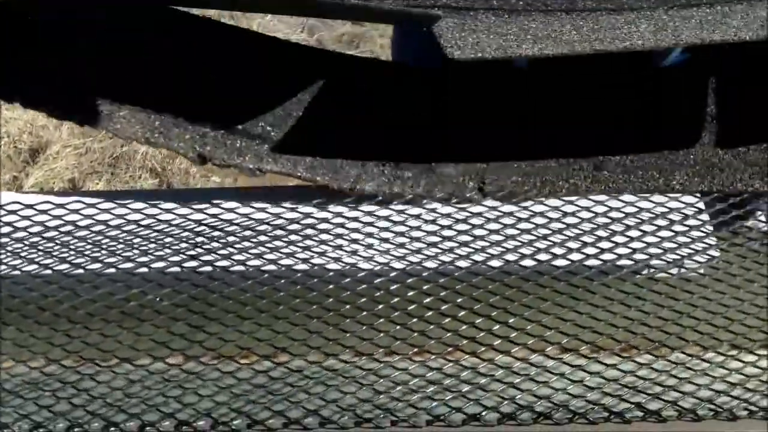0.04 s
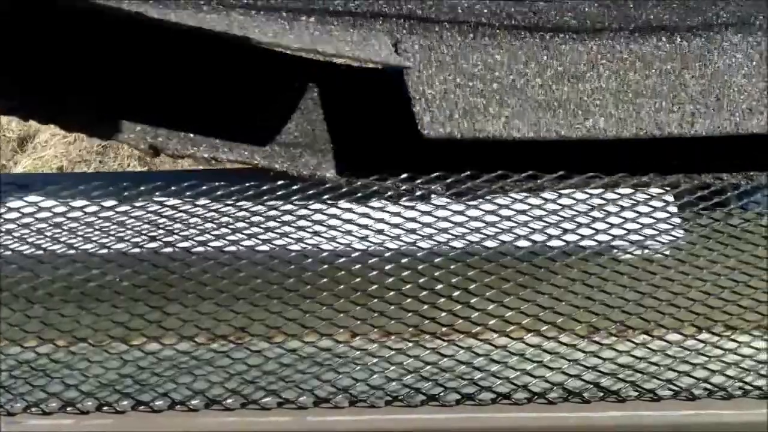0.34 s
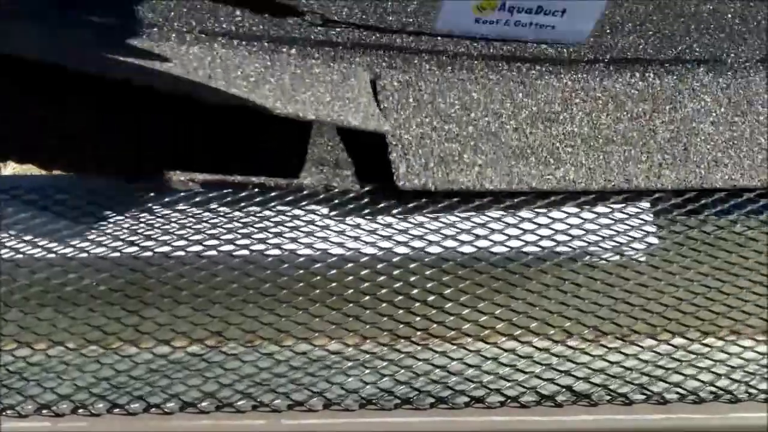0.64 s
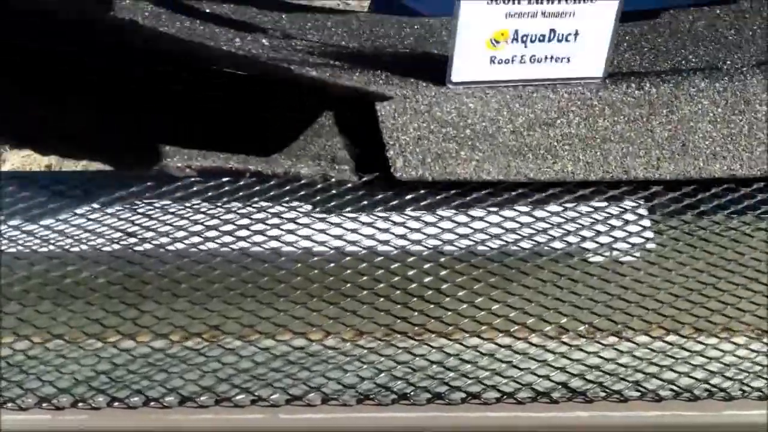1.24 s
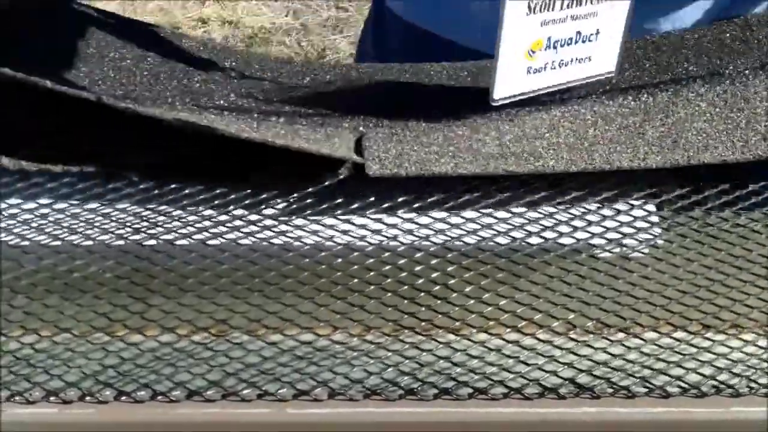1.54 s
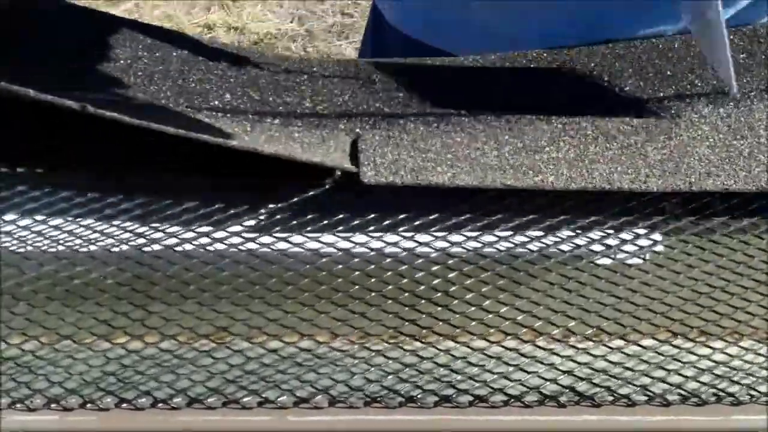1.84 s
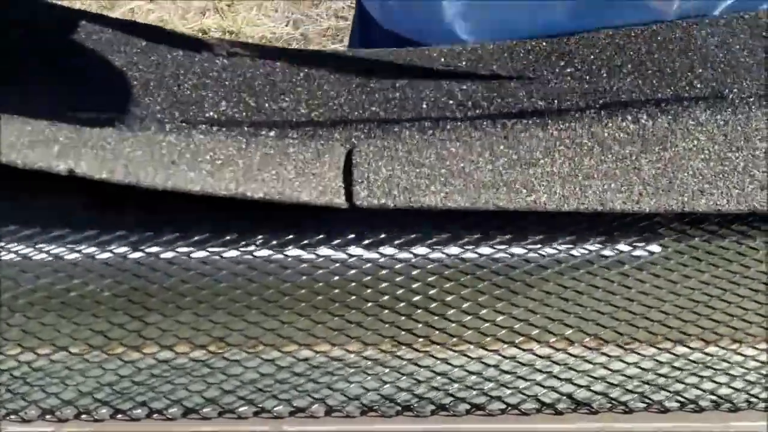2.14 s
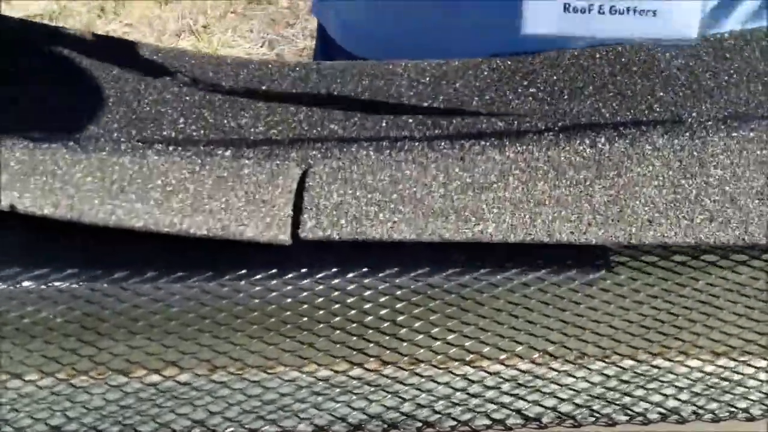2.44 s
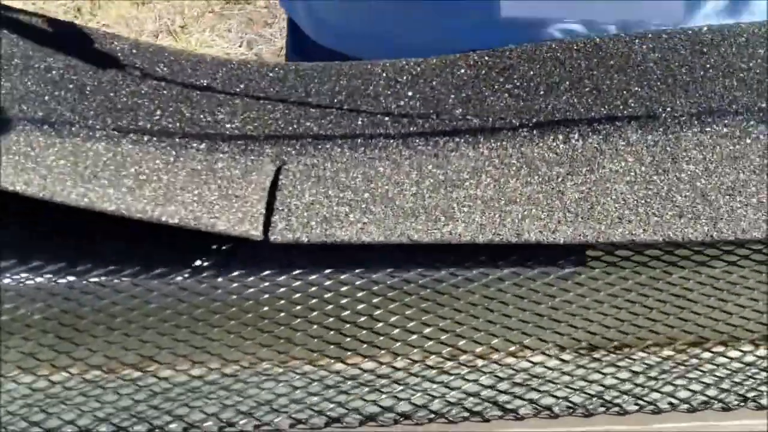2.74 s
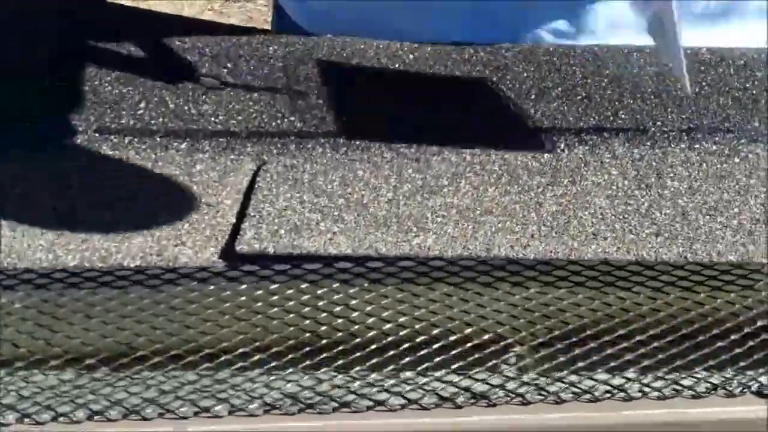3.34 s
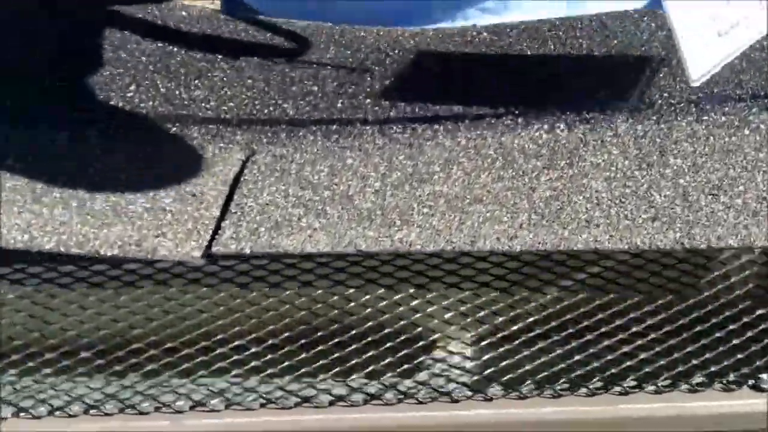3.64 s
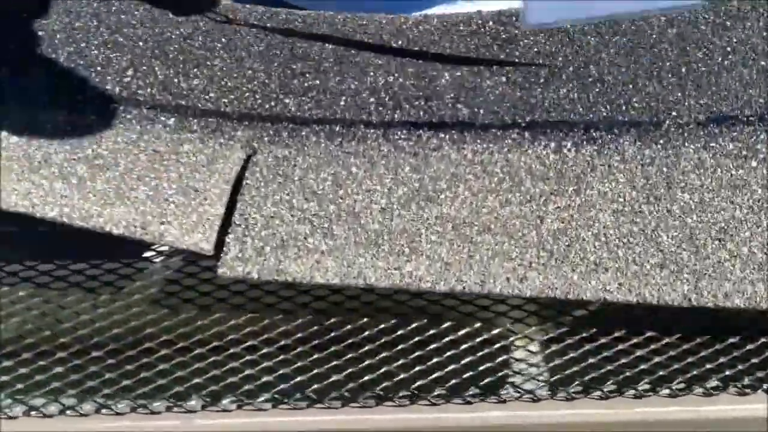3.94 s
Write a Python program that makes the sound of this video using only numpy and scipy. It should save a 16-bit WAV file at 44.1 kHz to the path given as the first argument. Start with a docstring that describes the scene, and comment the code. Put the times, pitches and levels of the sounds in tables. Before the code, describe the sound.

Close up outdoors, metal mesh grates against rough shingles in short, uneven pushes. Light wire ticks come first, then a brief chatter and small rattling snags, with low gusts of wind thumping on the microphone throughout.

```python
"""Metal mesh pushed under roof shingles

A sheet of expanded metal mesh slides in fits and starts, close to the microphone. Friction is a train
of tiny impacts: strands grate over the grit, chatter, snag and spring free. The impacts excite free
vibration, so the wires tick and the sheet rings hollow over the gutter. Wind buffets the microphone."""
import sys
import numpy as np
from scipy import signal
from scipy.fft import rfft, irfft
from scipy.io import wavfile
from scipy.ndimage import uniform_filter1d

SR = 44100
rng = np.random.default_rng(int(sys.argv[2]) if len(sys.argv) > 2 else 0)


def generate_wav(signal):
    """Clip the signal to [-1, 1] and save it as 16-bit WAV at the path in sys.argv[1]."""
    frames = np.transpose(np.atleast_2d(signal))
    scaled = np.clip(frames, -1, 1) * 32767
    pcm = np.round(scaled).astype(np.int16)
    wavfile.write(sys.argv[1], SR, pcm)


N = 176400

# Levels in the tables are relative; each source applies its own gain.
# Spectra of the outdoor air and of the wind's rumble and flutter (frequency [Hz], level [dB])
AIR_SPECTRUM = [(30, 57.5), (200, -25.5), (600, 11), (2000, -27), (8000, -111), (16000, -21)]
RUMBLE_SPECTRUM = [(10, -1), (25, 8), (42, -4), (70, 0.5), (110, -12), (200, -28.5), (500, -42.5),
                   (4000, -75)]
FLUTTER_SPECTRUM = [(50, -11), (120, 3), (190, -1.5), (320, -10), (500, -19), (1000, -31), (4000, -76)]
# Wind on the microphone (time [s], rumble level [dB], flutter level [dB])
GUSTS = [(0, -31, -42), (.08, -15, -37), (.18, -24, -53), (.25, -15.5, -29), (.55, -36, -35.5),
         (.76, -12, -22), (.86, -21.5, -33), (.92, -32, -27), (.98, -17.5, -24), (1.03, -35, -35.5),
         (1.18, -21.5, -38), (1.3, -14.5, -27), (1.42, -12.5, -15.5), (1.47, -24, -33), (1.51, -11.5, -23),
         (1.57, -17, -29), (1.71, -18.5, -21.5), (1.78, -24.5, -41), (1.87, -18, -42), (1.94, -28, -42),
         (1.99, -34, -17.5), (2.03, -24, -21), (2.12, -13, -23), (2.16, -23, -20.5), (2.3, -8, -12.5),
         (2.42, -21.5, -31), (2.58, -16, -20), (2.66, -24, -36), (2.76, -38, -41), (2.95, -32, -39),
         (3.08, -12, -25), (3.13, -22, -23), (3.2, -10, -17.5), (3.45, -13.5, -21.5), (3.54, -19, -20),
         (3.6, -13, -20), (3.8, -16.5, -30), (3.87, -13, -11), (3.93, -13.5, -39), (4, -16.5, -50)]
# Single eddies striking the microphone (time [s], level [dB], swing length [ms])
EDDY_STRIKES = [(.076, -20, 17), (.602, -12, 6.5), (0.744, -3, 10.3), (0.987, -8.5, 14),
                (1.407, -3.5, 14.5), (1.424, -10, 6), (1.508, -4, 6.8), (1.517, -5, 6.8),
                (1.605, -2.5, 9.2), (1.705, -11, 6.8), (1.868, -4, 13), (1.99, 0, 12), (2.045, -8.5, 25),
                (2.116, -5.5, 19), (2.577, -2, 6), (3.221, -4.5, 7.9), (3.243, -9, 9.5), (3.27, -4.5, 15),
                (3.342, -11, 11), (3.4112, 0.5, 5.5), (3.419, -10, 13), (3.483, -5, 6.8), (3.4935, -3.5, 3),
                (3.511, -10, 4.9), (3.564, -9, 5.9), (3.695, -1.5, 5.5), (3.764, -2, 10.4),
                (3.870, -10, 31)]
# Strands rubbing a shingle edge (time [s], half-length [s], resonance [Hz], level [dB])
RUBS = [(1.516, 0.0091, 2040, -23.5), (1.545, .02, 1620, -31), (1.56, 0.026, 1390, -29.5),
        (1.587, 0.016, 1950, -26), (1.613, 0.049, 1370, -31), (1.669, .012, 1880, -30.5),
        (1.694, 0.011, 1840, -25), (1.707, 0.038, 1680, -32)]
# Single wires flicking off a granule (time [s], level [dB])
WIRE_FLICKS = [(0.0925, -12), (0.1036, -1.5), (.114, -5.5), (.337, -9.5), (.3534, -8), (0.367, -6.5),
               (0.4275, -2), (.4285, -11), (.4305, -5), (0.4714, -7), (0.486, -5), (.4898, -13), (.495, -6),
               (0.5026, 2), (.5265, -11), (.5474, -18), (.566, -21), (0.5782, -10), (0.6807, -16.5),
               (.694, -14), (0.7112, -11), (0.763, -5.5), (0.7878, -5.5), (2.9502, -25)]
# Snagged mesh springing free (time [s], level [dB], decay time [s])
RELEASES = [(0.9536, -22, .008), (1.005, -11.5, 0.0079), (1.107, -13.5, 0.011), (1.206, -15.5, 0.0059),
            (1.803, -11, 0.0052), (2.045, -20, 0.008), (2.2078, -11.5, 0.01), (2.315, -18.5, 0.012),
            (2.433, -15, 0.02), (2.621, -13, 0.013), (2.686, -19, .008), (2.728, -9.5, 0.0065),
            (2.807, -13.5, 0.0091), (2.826, -12, 0.0058), (2.973, -18.5, 0.011), (3.521, -25.5, 0.0082),
            (3.574, -21.5, 0.026), (3.9745, -12, 0.0081)]
# Spectra of the four kinds of contact (frequency [Hz], level [dB])
TICK_SPECTRUM = [(300, -74), (2000, -22), (4500, -13.5), (6400, -3), (7500, -11), (9200, -2), (11500, -16),
                 (16000, -18)]
SNAG_SPECTRUM = [(150, -11), (450, -16), (650, 7.5), (1000, 6), (2000, -16), (3200, -0.5), (4800, -1),
                 (6400, 5.5), (7400, -7), (8900, 4), (11500, -5.5), (16000, -16)]
RASP_SPECTRUM = [(150, 1), (350, 6.5), (800, -1), (1000, -1), (1200, -14), (1450, 0.5), (1850, 2),
                 (2500, -3), (3200, -3), (4200, -9.5), (6000, -6.5), (12000, -87)]
GRATING_SPECTRUM = [(1500, -20), (2500, -6), (4000, -4.5), (5200, -3), (6450, -0.5), (7000, -7.5),
                    (7800, -6), (8850, 2.5), (10000, -5.5), (11500, -10.5), (13500, -19), (16000, -18)]
# Normal modes of the sheet (frequency [Hz], level [dB], T60 [s])
SHEET_MODES = [(261, -13, 0.18), (323, -13.5, 0.096), (488, -6.5, 0.17), (528.3, -2.5, 0.078),
               (561.5, -1.5, 0.08), (601, -2.5, .1), (659, -1, 0.036), (716.7, -3.5, 0.096),
               (781, -9, 0.068), (855, -11.5, 0.12), (1141, -12.5, .07), (1241, -7.5, 0.027)]
# Strength of the sliding contact (time [s], level [dB])
SLIDE_LEVEL = [(0, -24.5), (.02, -31), (.06, -31), (.10, -31), (.13, -33), (.175, -24.5), (.22, -23),
               (.29, -29.5), (.4, -31), (.46, -28.5), (.495, -18), (.515, -28.5), (.557, -39.5), (.65, -45),
               (.75, -44.5), (.785, -27.5), (.82, -37.5), (.86, -28), (.892, -42), (.94, -37), (.964, -21),
               (1.01, -19.5), (1.05, -24), (1.1, -31.5), (1.113, -21), (1.19, -30.5), (1.21, -25),
               (1.275, -35), (1.3, -29), (1.33, -40.5), (1.48, -35), (1.51, -20), (1.59, -25.5),
               (1.64, -29.5), (1.715, -23), (1.77, -26.5), (1.796, -39), (1.808, -15), (1.85, -22),
               (1.89, -34), (1.975, -27.5), (2.0, -33), (2.035, -40), (2.047, -25.5), (2.085, -34),
               (2.105, -27.5), (2.167, -39.5), (2.2, -38.5), (2.209, -19.5), (2.28, -30.5), (2.335, -18),
               (2.405, -29), (2.44, -21), (2.49, -29.5), (2.555, -36), (2.59, -20), (2.628, -18.5),
               (2.67, -23), (2.7, -19), (2.76, -23.5), (2.79, -22), (2.82, -19.5), (2.855, -23.5),
               (2.895, -21), (2.94, -28), (2.98, -26), (3.09, -33), (3.11, -24), (3.15, -28), (3.195, -17),
               (3.245, -26.5), (3.29, -36.5), (3.32, -31.5), (3.44, -48), (3.5, -35.5), (3.56, -36.5),
               (3.595, -17.5), (3.69, -24), (3.72, -33), (3.79, -43.5), (3.807, -30), (3.835, -29.5),
               (3.855, -21.5), (3.9, -36), (3.999, -19)]
# Balance against the grating (time [s], sheet level [dB], rasp level [dB])
SCRAPE_BALANCE = [(0, 2.5, 6), (.1, 0, -3), (.22, 0.5, -5.5), (.42, 2, -1), (.5, -12, -8), (.62, 4.5, -2.5),
                  (.8, 0.5, -3.5), (.95, 1.5, -3.5), (1.25, 4.5, 0.5), (1.42, 0.5, -6), (1.52, -10, -8.5),
                  (1.62, -7, -26), (1.76, -9, -8), (1.83, 1.5, -2.5), (2.15, 4, 0.5), (2.33, -1, -3),
                  (2.54, 3.5, 3), (2.63, -0.5, -5), (2.92, 0.5, 0.5), (3.08, 3, -1), (3.2, -2.5, -3),
                  (3.42, -2, 2), (3.62, -7.5, -2), (3.76, 4, -3.5), (3.86, -7, -9), (4, 2, -3)]


def undb(db):
    """Amplitude ratio of a level in decibels."""
    return 10 ** (np.asarray(db) / 20)


def unit(x):
    """Normalisation to an rms of 1."""
    return x / np.sqrt(np.mean(x ** 2))


def curves(rows):
    """Linear interpolation of each column over time."""
    rows = np.array(rows, float)
    rows = rows[np.argsort(rows[:, 0], kind="stable")]
    return [np.interp(np.arange(N) / SR, rows[:, 0], column) for column in rows.T[1:]]


def wander(rate):
    """Random fluctuation of unit rms: noise averaged twice over 1/rate seconds."""
    width = max(int(SR / rate), 2)
    averaged = uniform_filter1d(rng.standard_normal(N), width, mode="wrap")
    return unit(uniform_filter1d(averaged, width, mode="wrap"))


def convolve(x, response):
    """Convolution with an impulse response scaled to unit energy."""
    return signal.fftconvolve(x, response / np.linalg.norm(response))[:N]


def colour(x, spectrum, size=8192):
    """Minimum-phase filtering to a spectral shape, by folding the cepstrum."""
    hz, db = np.array(spectrum).T
    bins_hz = np.maximum(np.fft.rfftfreq(size, 1 / SR), 1)
    gain = undb(np.interp(np.log(bins_hz), np.log(hz), db))
    cepstrum = irfft(np.log(gain))
    cepstrum[1:size // 2] *= 2
    cepstrum[size // 2 + 1:] = 0
    return convolve(x, irfft(np.exp(rfft(cepstrum))))


def damping(t, t60):
    """Exponential decay by 60 dB in t60 seconds."""
    return np.exp(-np.log(1000) * t / t60)


def air():
    """Ambient noise: quiet outdoor air as a steady random pressure."""
    return undb(-53) * colour(rng.standard_normal(N), AIR_SPECTRUM)


def turbulence(spectrum, eddies_per_s=54, depth_db=3.5):
    """Turbulent pressure: noise whose level fluctuates as eddies pass."""
    pressure = rng.standard_normal(N) * undb(depth_db * wander(eddies_per_s))
    return unit(colour(pressure, spectrum))


def wind(ceiling=.62):
    """Turbulence and single eddies press on the microphone; saturation rounds the largest swings."""
    t = np.arange(N) / SR
    rumble_db, flutter_db = curves(GUSTS)
    pressure = turbulence(RUMBLE_SPECTRUM) * undb(rumble_db - 1.5)
    pressure += turbulence(FLUTTER_SPECTRUM) * undb(flutter_db - 3)
    for time, db, swing_ms in EDDY_STRIKES:
        phase = 2 * np.pi * (t - time) / (swing_ms / 1000)
        pressure -= undb(db) * phase / (1 + (phase / 2) ** 2) ** 2  # a push, then suction
    return ceiling * np.tanh(pressure / ceiling)


def grit(per_s, spread_db):
    """A Poisson process of impacts between strands and granules, random in strength and sign."""
    strength = np.minimum(rng.exponential(size=N), 4)
    hits = rng.random(N) < per_s / SR
    return unit(hits * undb(spread_db * strength) * rng.choice([-1, 1], N))


def wire_response(samples, t60, ring_db):
    """Impulse response of a wire: the direct click, then a damped, noisy ring."""
    response = rng.standard_normal(samples) * damping(np.arange(samples) / SR, t60)
    response *= undb(ring_db) / np.linalg.norm(response)
    response[0] = 1
    return response


def wires(force, t60=.054, ring_db=1.5, count=14, shifts_per_s=12):
    """A wandering load: each impact rings whichever wire bears the most at that instant."""
    loads = [7 * wander(shifts_per_s) + 10 * rng.random(N) for _ in range(count)]
    struck = np.argmax(loads, axis=0)
    return sum(convolve(force * (struck == k), wire_response(SR // 12, t60, ring_db))
               for k in range(count))


def sheet(force):
    """Modal superposition: each impact drives each low mode of the sheet with a random sign."""
    t = np.arange(SR // 3) / SR
    sound = 0
    for hz, db, t60 in SHEET_MODES:
        mode = np.sin(2 * np.pi * hz * t) * damping(t, t60)
        sound += undb(db) * convolve(force * rng.choice([-1, 1], N), mode)
    return sound / np.linalg.norm(undb([db for _, db, _ in SHEET_MODES]))


def crumbs(follow=.78):
    """Light impacts: loose granules tick on the wires, even while the mesh barely moves."""
    slide_db, = curves(SLIDE_LEVEL)
    hits = grit(per_s=60, spread_db=4) * undb(follow * slide_db - 18)
    return colour(wires(hits, t60=.025, ring_db=-2, count=4), TICK_SPECTRUM)


def chatter(relative_bandwidth=.29):
    """Stick-slip friction: each short rub excites a strand's resonance at a different pitch."""
    t = np.arange(N) / SR
    sound = 0
    for time, half_length, hz, db in RUBS:
        resonance = signal.iirpeak(hz, 1 / relative_bandwidth, fs=SR)
        strand = signal.lfilter(*resonance, grit(per_s=1200, spread_db=3))
        envelope = np.exp(-2 * ((t - time) / half_length) ** 2)
        sound += unit(strand) * undb(db - 3) * envelope
    return sound


def ticks():
    """Impulsive excitation: a wire flicks off a granule with a thin click and a brief ring."""
    samples = SR // 20
    flicks = np.zeros(N + samples)
    for time, db in WIRE_FLICKS:
        start = int(time * SR)
        flicks[start:start + samples] += undb(db + 1.5) * wire_response(samples, t60=.0085, ring_db=-1)
    return colour(flicks, TICK_SPECTRUM)


def snags():
    """Release of elastic energy: a caught edge lets go in a fading rattle that shakes the sheet."""
    t = np.arange(N) / SR
    force = sum(undb(db - .5) * (t >= time) * np.exp(-np.abs(t - time) / decay)
                for time, db, decay in RELEASES)
    rattle = force * grit(per_s=28000, spread_db=-1)
    return colour(rattle, SNAG_SPECTRUM) + undb(-15.5) * sheet(rattle)


def scrape(judders_per_s=108, judder_db=2):
    """Sliding friction: dense, juddering impacts excite bright grating, coarse rasp and hollow ring."""
    slide_db, = curves(SLIDE_LEVEL)
    sheet_db, rasp_db = curves(SCRAPE_BALANCE)
    judder = unit(undb(judder_db * wander(judders_per_s)))
    force = judder * undb(slide_db)
    fine, coarse = (force * grit(per_s=4500, spread_db=2.5) for _ in range(2))
    grating = colour(wires(fine), GRATING_SPECTRUM) * undb(-4)
    rasp = colour(wires(coarse), RASP_SPECTRUM) * undb(rasp_db - 2.5)
    hollow = sheet(coarse * undb(sheet_db - 3))
    return grating + rasp + hollow


def scene():
    """Superposition: the pressures from air, mesh and wind add in one channel."""
    return (air() + scrape() + crumbs() + snags() + ticks() + chatter() + wind())[None]


def record(dry):
    """Clipping and band limiting: the signal is held to full scale, then loses its highest treble."""
    lowpass = signal.ellip(10, .2, 80, 15800, fs=SR, output="sos")
    return signal.sosfilt(lowpass, np.clip(dry, -1, 1))


dry = scene()
out = record(dry)
generate_wav(out)
```